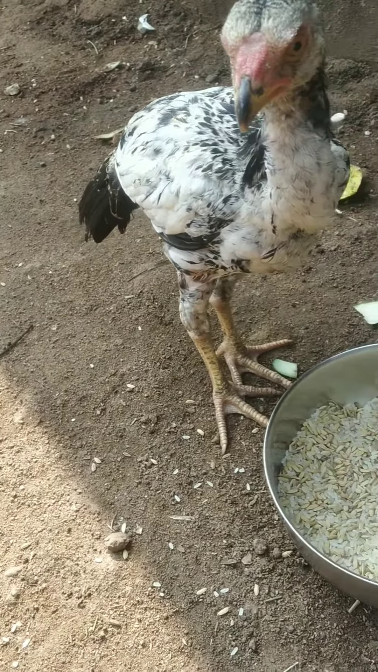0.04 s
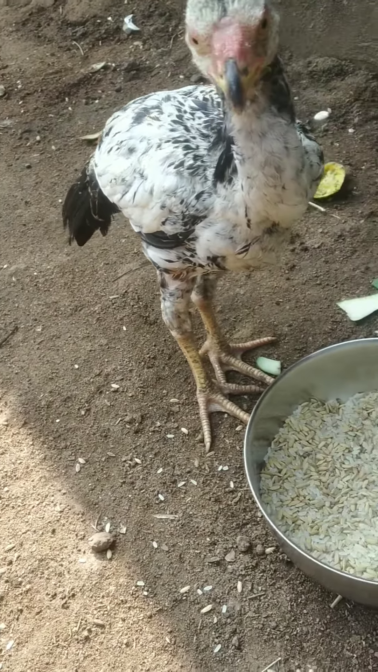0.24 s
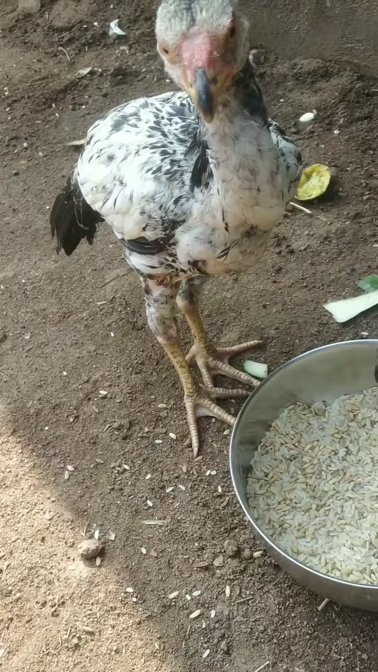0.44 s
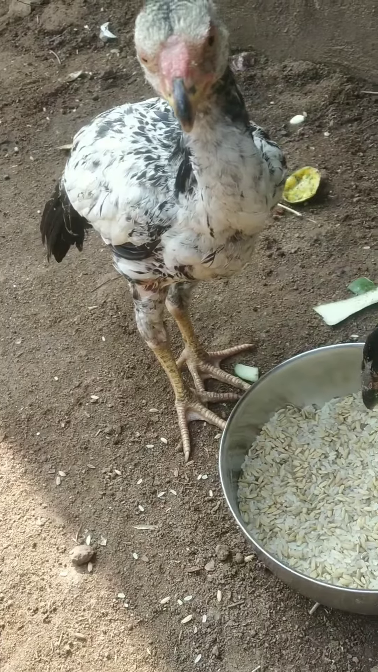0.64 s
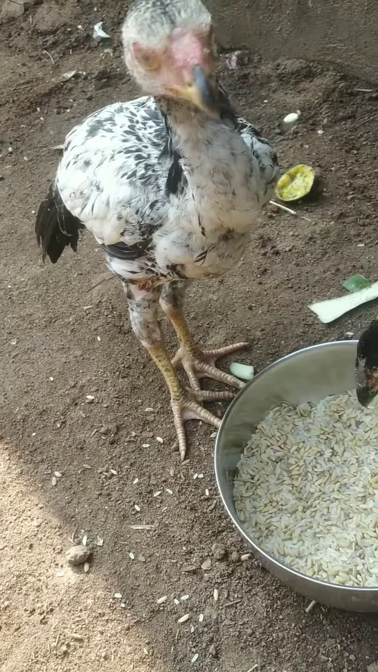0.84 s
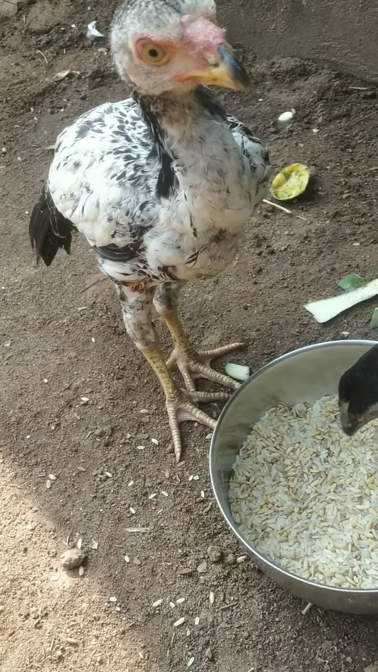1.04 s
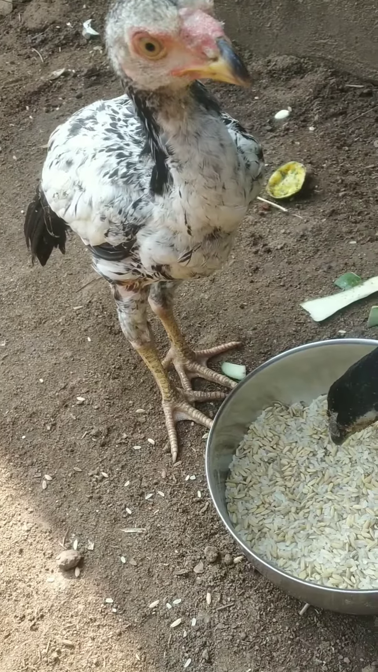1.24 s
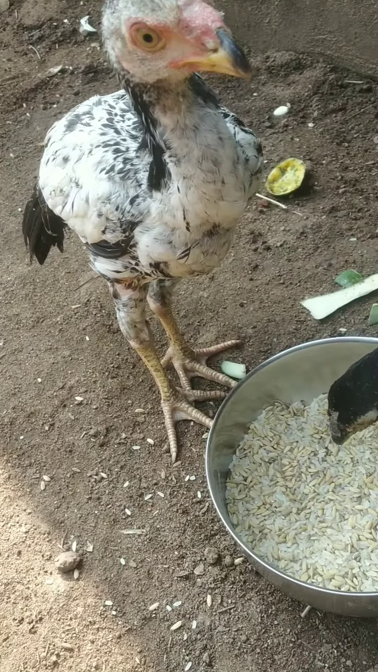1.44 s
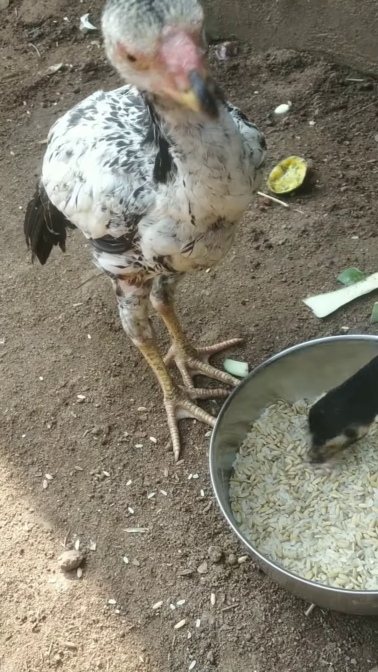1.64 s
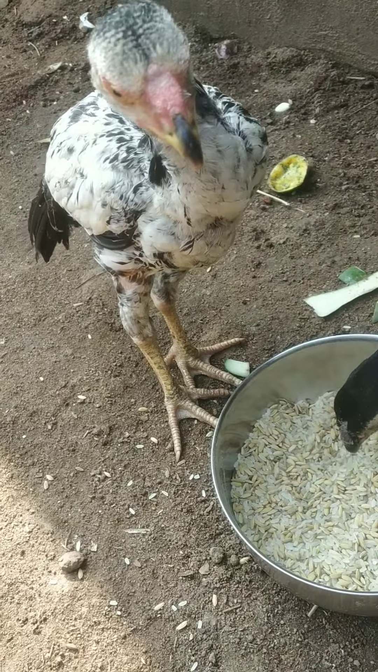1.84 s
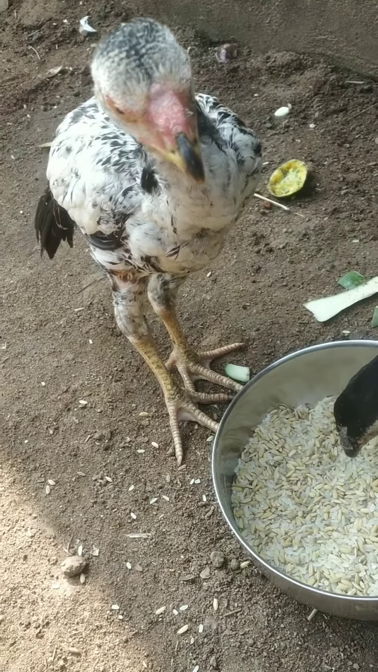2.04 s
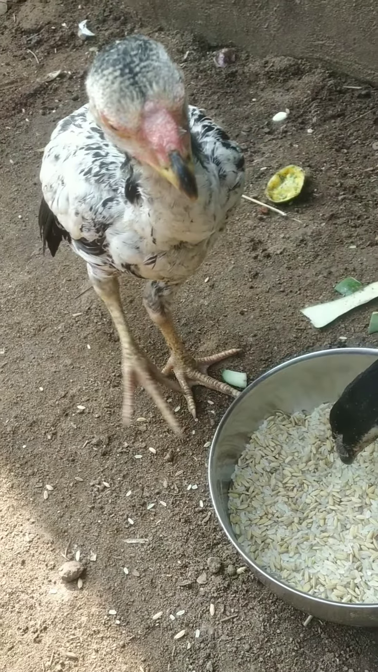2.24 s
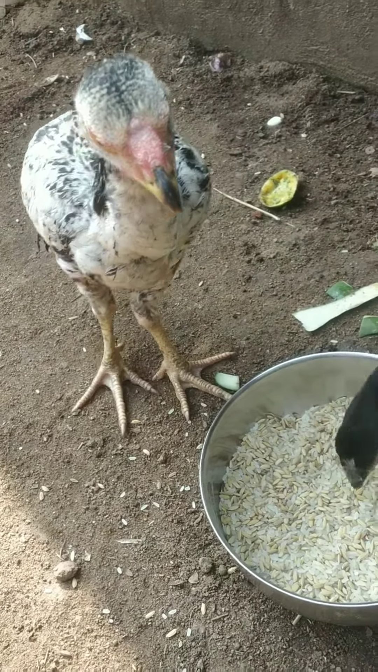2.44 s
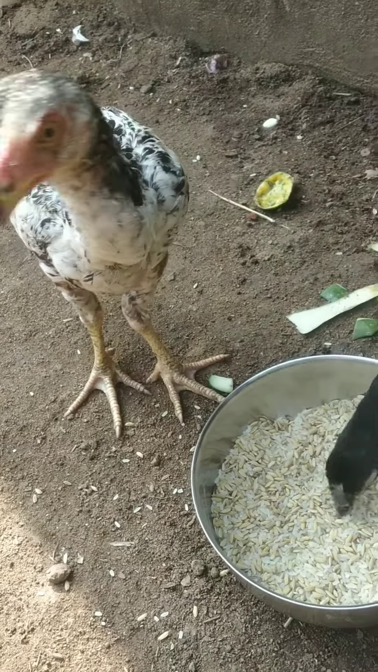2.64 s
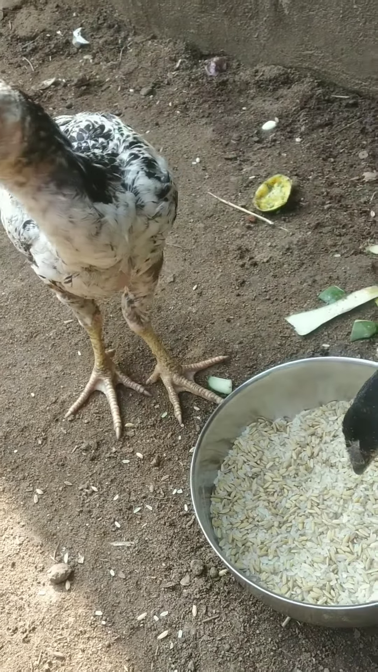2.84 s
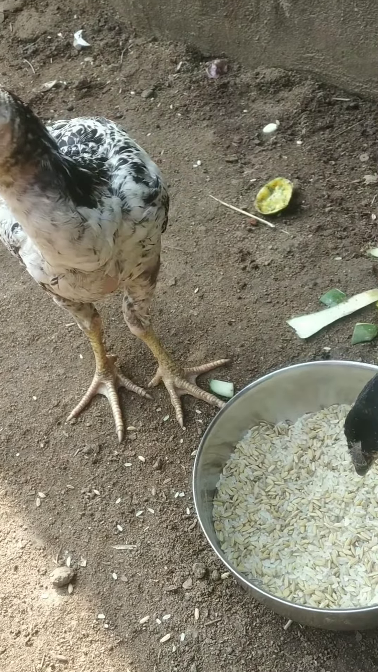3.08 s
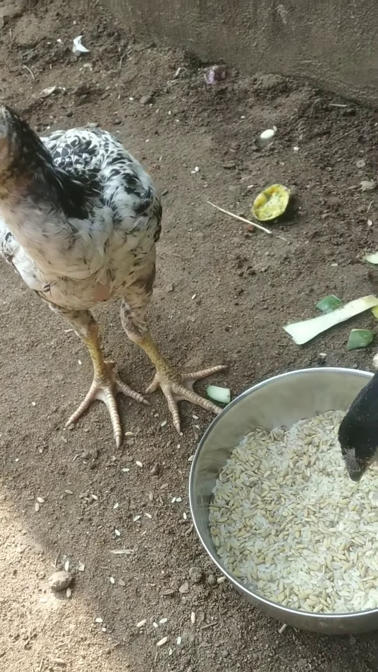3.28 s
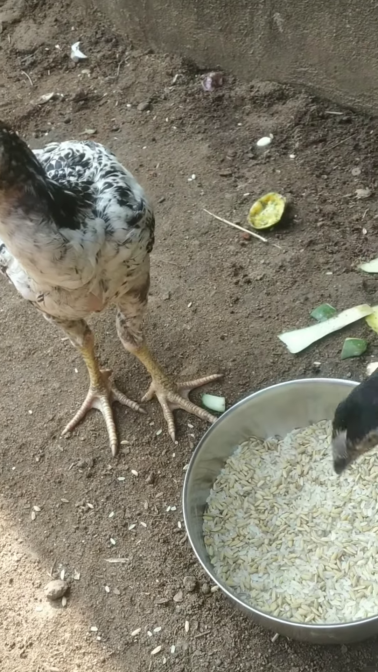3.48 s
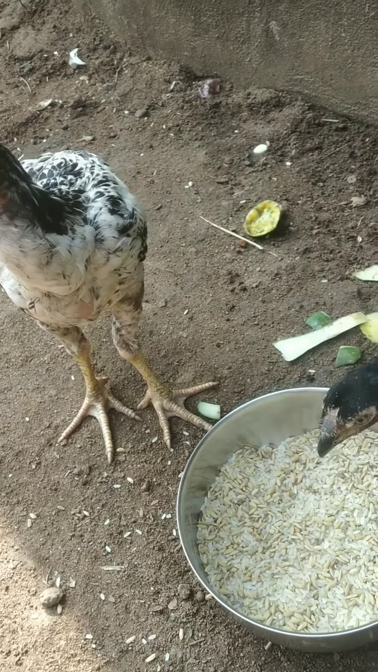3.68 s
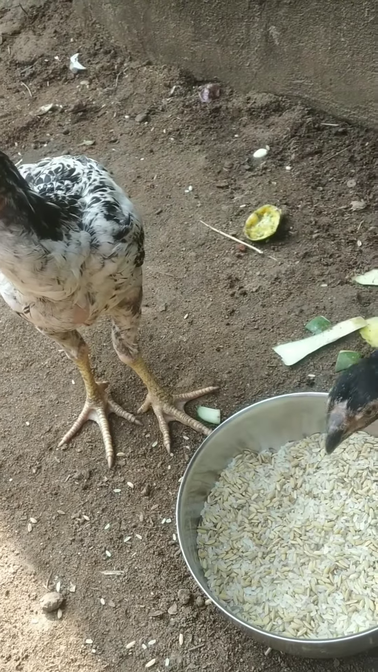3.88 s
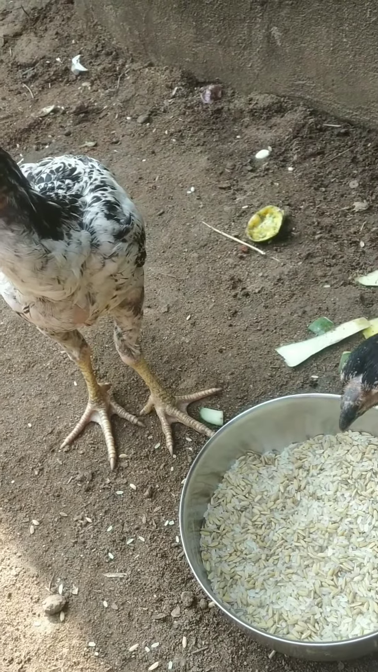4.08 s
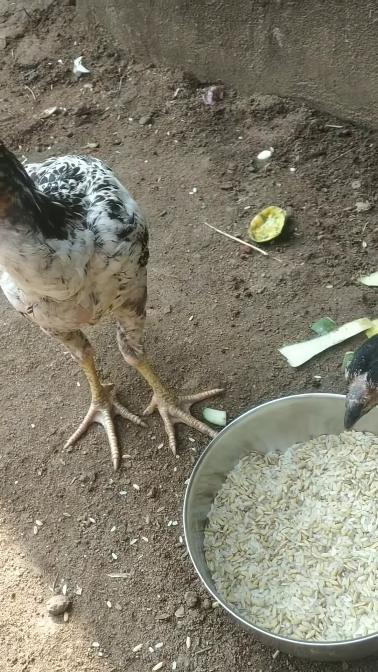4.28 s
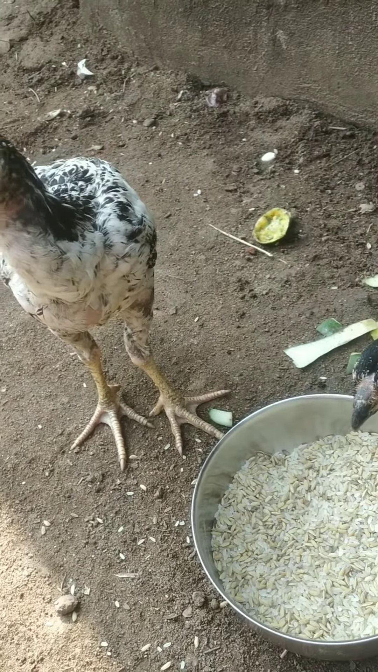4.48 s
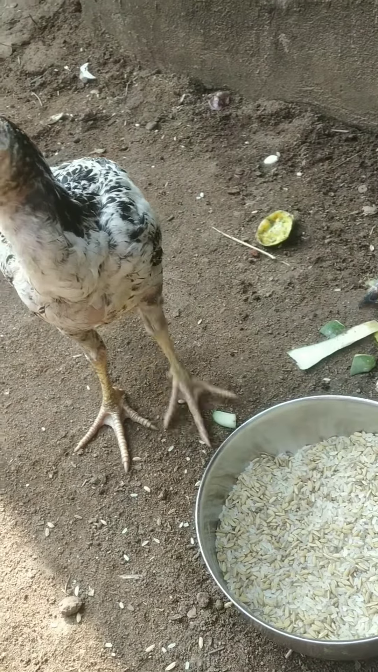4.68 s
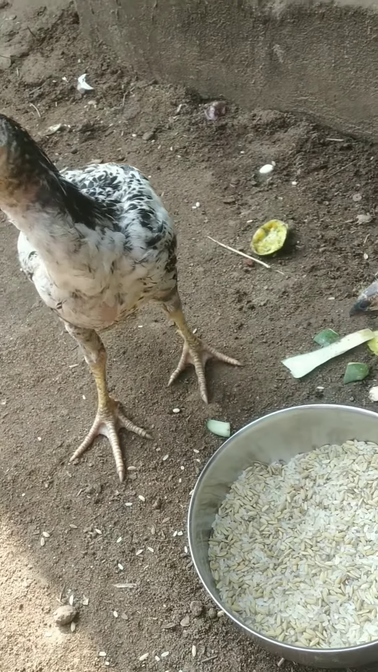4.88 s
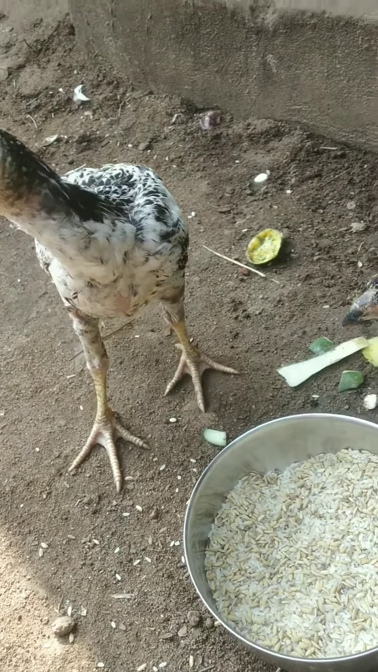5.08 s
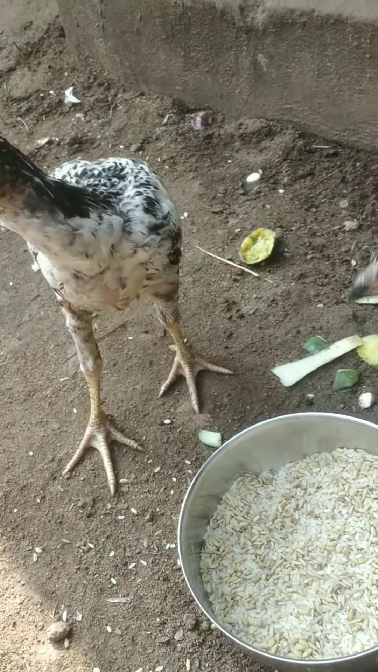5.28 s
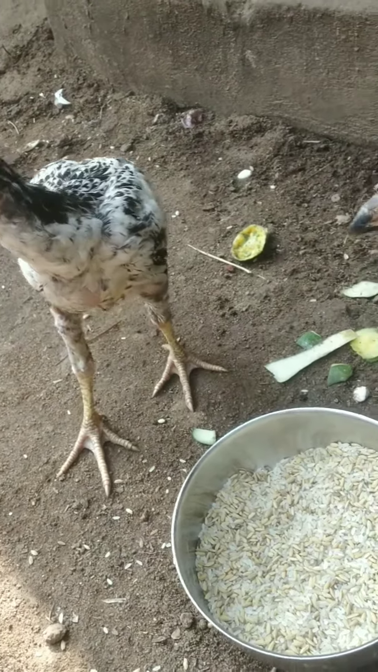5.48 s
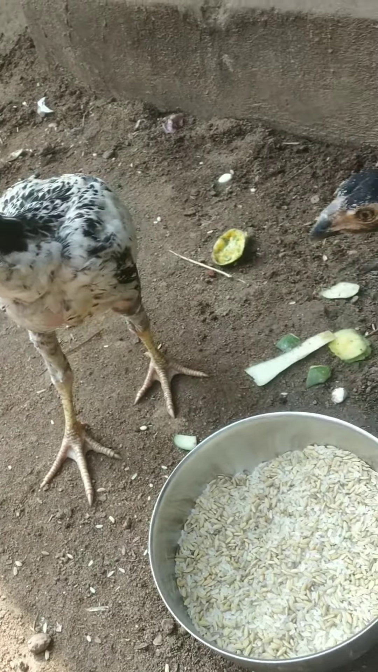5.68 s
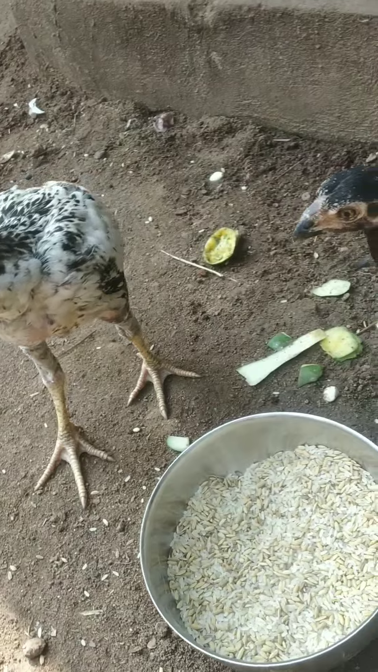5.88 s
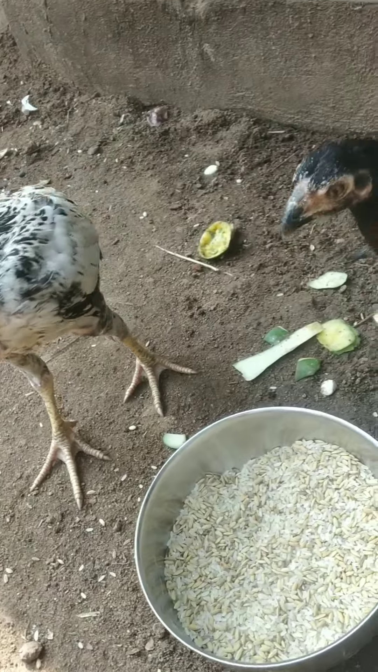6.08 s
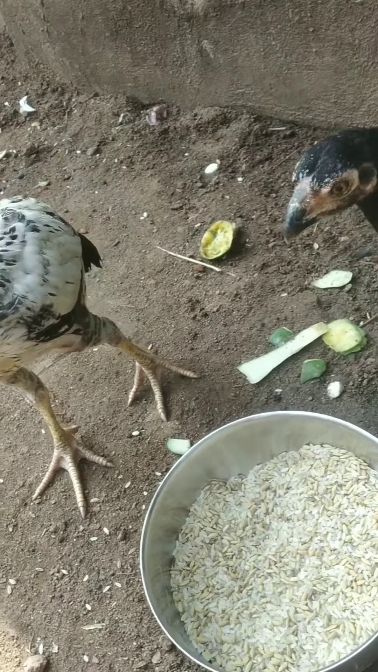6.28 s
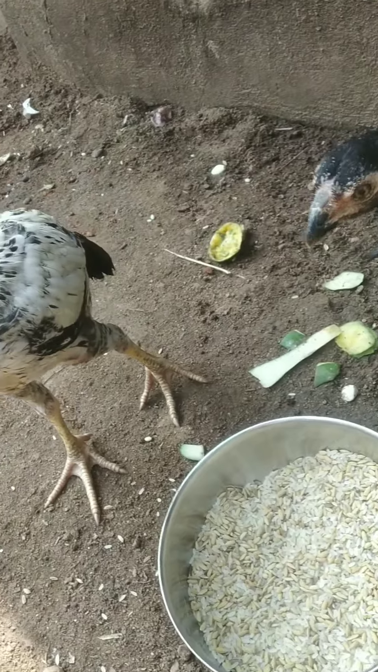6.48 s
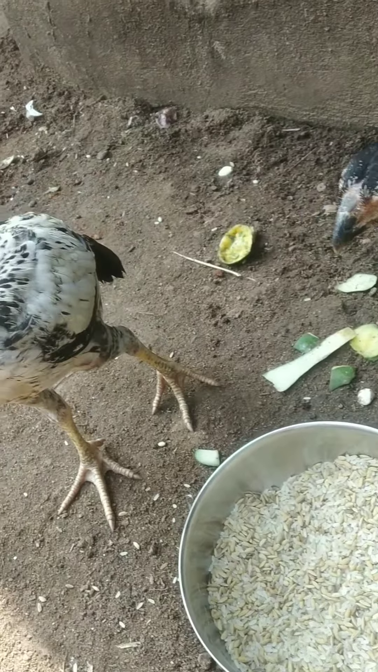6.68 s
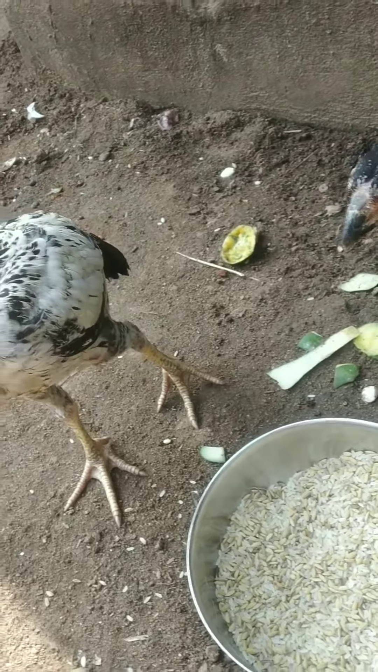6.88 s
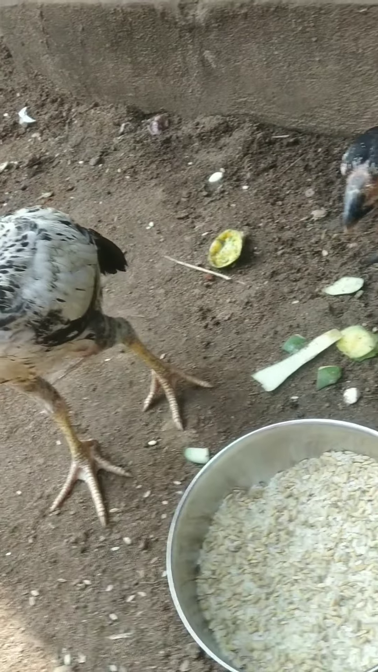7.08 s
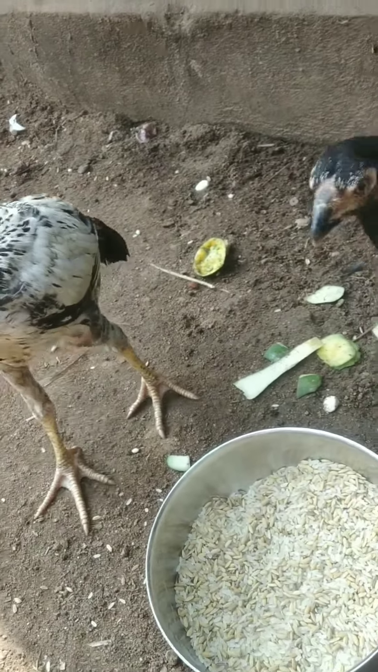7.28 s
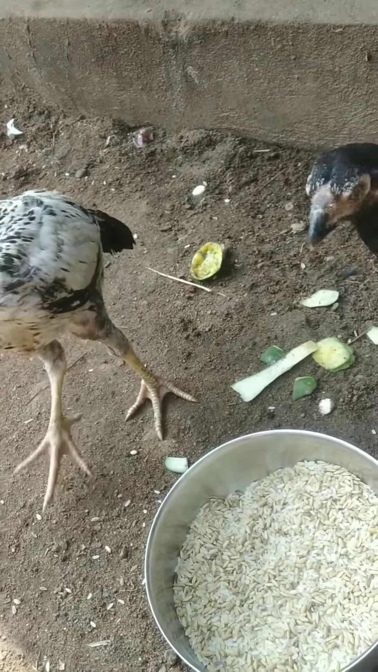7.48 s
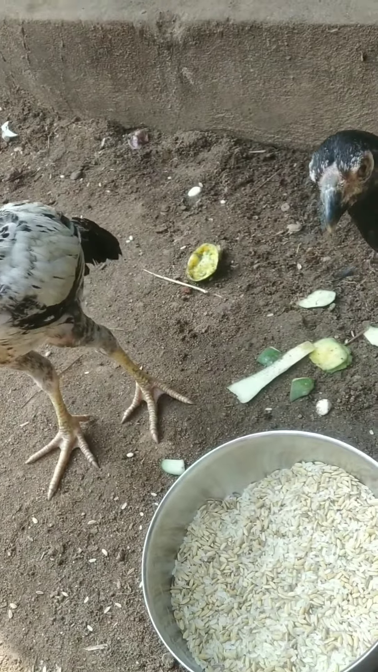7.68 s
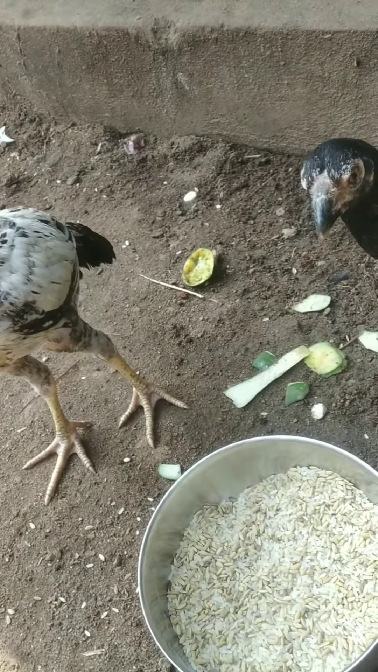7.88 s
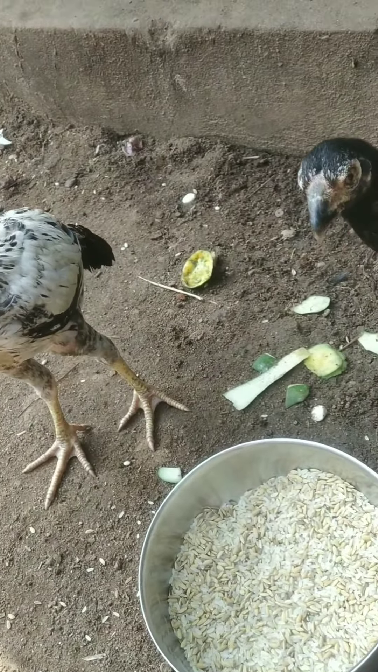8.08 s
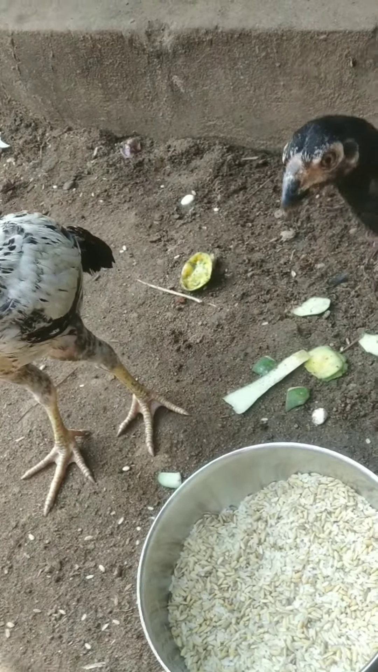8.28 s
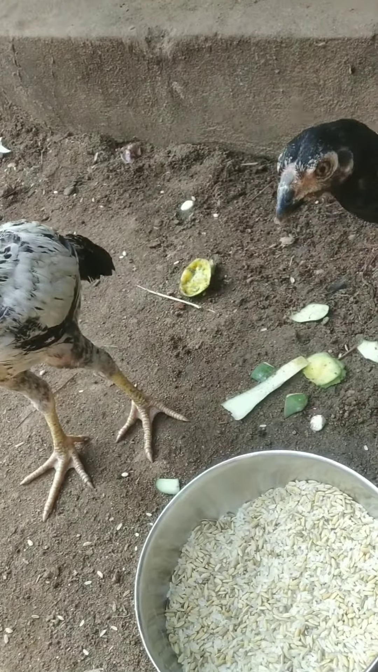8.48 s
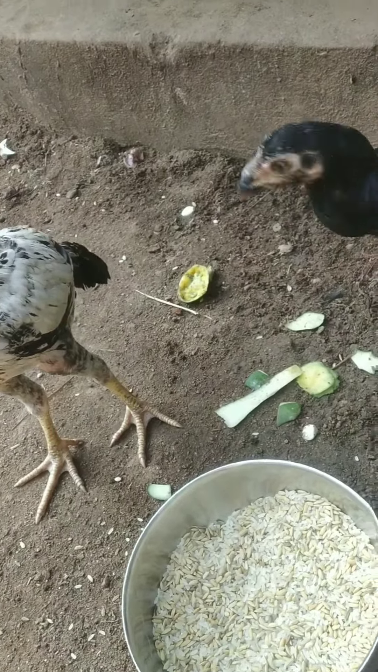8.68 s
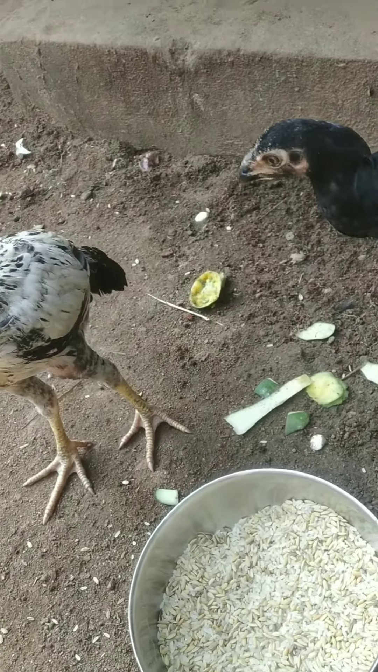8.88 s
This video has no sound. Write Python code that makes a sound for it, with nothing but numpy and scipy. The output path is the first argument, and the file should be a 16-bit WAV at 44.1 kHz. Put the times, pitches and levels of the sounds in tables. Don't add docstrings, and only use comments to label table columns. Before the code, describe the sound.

A handheld microphone sits near young chickens around a feed bowl. Fluttering, raspy whistles come first, then louder cracked squawks, a strong foot scrape with crisp double taps near five seconds, and a sparser spell of small peeps. Another squawk with a second hen leads into more scratchy calls and low clucks at the end. Faint distant birds and gentle low air noise fill the gaps outdoors.

```python
import sys
import numpy as np
from scipy import signal
from scipy.fft import rfft, irfft
from scipy.io import wavfile
from scipy.ndimage import uniform_filter1d, minimum_filter1d

SR = 44100
rng = np.random.default_rng(int(sys.argv[2]) if len(sys.argv) > 2 else 0)


def gain_from_decibels(decibels):
    exponent = np.asarray(decibels, float) / 20
    return 10 ** exponent


def put_to_file(sound):
    columns = np.atleast_2d(sound).T
    safe = np.clip(columns, -1, 1)
    whole_steps = np.round(safe * 32767)
    wavfile.write(sys.argv[1], SR, whole_steps.astype(np.int16))


N = 393813


def evened(x):
    return x / np.sqrt(np.mean(x ** 2) + 1e-20)


def read(points, hz):
    f, value = np.transpose(points)
    return np.interp(np.log(hz + 1), np.log(f + 1), value)


def add(mix, s, sound, lag):
    for port, start in zip(mix, (round(s * SR), round(s * SR) + lag)):
        part = port[start:][:len(sound)]
        part += sound[:len(part)]


def colour(x, points):
    gain = gain_from_decibels(read(points, np.fft.rfftfreq(x.shape[-1], 1 / SR)))
    return irfft(rfft(x) * gain, x.shape[-1])


def band(x, lo_hz, hi_hz, order=2):
    edges_hz = [lo_hz, min(hi_hz, SR / 2.2)]
    return signal.sosfilt(signal.butter(order, edges_hz, "band", fs=SR, output="sos"), x)


def wander(n, hz):
    settle = int(2 * SR / hz)
    return evened(band(rng.standard_normal(n + settle), hz / 4, hz)[settle:])


def peep(rows, flutter, hoarse):
    # frequency in Hz, gain in dB.
    beak_db = [(4300, -10), (4900, -2.5), (5400, -1), (6200, -9), (8000, 1), (10300, -5.5), (11800, -13.5),
               (15500, -0.5)]
    s, *columns = np.transpose(rows)
    t = np.arange(s[0], s[-1], 1 / SR)
    n = len(t)
    glide_hz, level_db, half_db, rasp_db, over_db = (np.interp(t, s, c) for c in columns)

    beat = (rng.random() + np.cumsum(58 * (1 + .15 * wander(n, 15))) / SR) % 1
    arch = np.sin(np.pi * beat)
    steep = np.clip(abs(np.gradient(glide_hz)) * SR / 32000, 0, 1) ** 2
    steep = uniform_filter1d(steep, 300)

    reread_s = min(.6 * flutter, .042) * steep * (beat - .5)
    hz = np.interp(t + reread_s, s, columns[0]) * (1 + flutter * (arch - 2 / np.pi))
    unrest = .045 * hoarse * np.clip(gain_from_decibels(rasp_db), 0, 1) * wander(n, 400)
    turn = 2 * np.pi * np.cumsum(hz * (1 + unrest)) / SR

    depth = min(12 * flutter, 1) * steep + 4 * flutter + .25 * wander(n, 30)
    depth = np.clip(depth, 0, 1)
    catch = evened(1 - depth * np.exp(-(arch / (.6 * depth + .01)) ** 2))

    windpipe = gain_from_decibels(2.14 * np.exp(-((hz - 2500) / 280) ** 2))
    half = np.cos(turn / 2) + 0.18 * np.cos(3 * turn / 2)
    voiced = np.sqrt(2) * (windpipe * np.cos(turn) + gain_from_decibels(half_db) * half)
    voiced = voiced * gain_from_decibels(1.72 * wander(n, 51.7))

    fuzzy = [np.cos(k * turn / 4) * wander(n, 200 * hoarse) for k in range(1, 18)]
    stack = sum(np.cos(k * turn) * gain_from_decibels(5 * wander(n, 25)) * 2 / k for k in range(2, 5))
    stack = stack + np.clip(gain_from_decibels(half_db), .15, 1) * sum(fuzzy[5::4])
    breath = rng.standard_normal(n)
    ragged = evened(sum(fuzzy[7::4]) + 1.3 * breath)
    over = evened(colour(evened(stack) + hoarse * ragged, beak_db))

    throat = band(breath, 1500, 1850) + band(breath, 2250, 2750) + .35 * band(breath, 1100, 3500, order=4)
    quarters = evened(sum(fuzzy[1:4]) + hoarse * fuzzy[3] + .3 * fuzzy[0])
    rasp = evened(quarters + .6 * evened(throat))

    patchy_db = 1
    rough = gain_from_decibels(rasp_db + patchy_db * wander(n, 21.1)) * rasp
    rough = rough + gain_from_decibels(over_db + patchy_db * wander(n, 20.33)) * over
    sound = catch * voiced + np.sqrt(catch) * rough
    return s[0], gain_from_decibels(level_db) * sound * signal.windows.tukey(n, .12)


def arched(start, rise, hold, fall, top_hz, drift_hz, whistle_db, opens, shuts, growth_db):
    s = start + np.cumsum([0, rise / 2, rise / 2, hold, fall / 2, fall / 2])
    up = top_hz * np.array([opens, opens + (1 - opens) * .62, 1])
    down = (top_hz + drift_hz) * np.array([1, shuts + (1 - shuts) * 0.54, shuts])
    level_db = np.array([-3, -6, 0, 0, 2.5, -15])
    level_db = level_db + growth_db / 2 * np.repeat([-1, 1], 3)
    return np.transpose([s, np.hstack([up, down]), whistle_db + level_db])


def broken(rows, *voice_db):
    rows = np.array(rows)
    edge_db = np.zeros(len(rows))
    edge_db[[0, -1]] = -14
    return np.hstack([rows, np.add.outer(edge_db - rows[:, 2], voice_db)])


def arched_peeps(near):
    # start in seconds, rise, hold and fall in seconds, top pitch in Hz.
    clear = [
        (0.101, .017, 0.017, .035, 2331),
        (1.961, 0.045, 0.05, 0.059, 3380),
        (2.306, .017, 0.15, 0.029, 2727),
        (2.568, 0.056, 0.031, 0.052, 3682),
        (3.399, .04, .045, 0.027, 3118),
        (7.241, .055, .045, 0.02, 2820),
        (8.103, 0.027, 0.12, 0.042, 3512),
        (8.796, 0.025, 0.061, 0.03, 2874),
    ]
    hoarse_calls = [
        (0.873, .075, .11, 0.073, 3570),
        (1.277, 0.057, 0.17, 0.031, 3063),
        (1.643, .05, 0.073, 0.029, 3713),
        (6.776, 0.015, 0.052, 0.058, 2437),
        (6.997, .012, .082, 0.032, 3392),
        (7.492, 0.033, 0.055, 0.062, 3484),
        (7.715, 0.044, 0.01, 0.048, 3775),
    ]
    # pitch drift over the hold in Hz, then whistle, half-pitch line, rasp and overtones in dB.
    clear_voice, hoarse_voice = [(106, -16, -23.5, -21, -28.5), (-230, -14.5, -57, -28.5, -22),
                                 (19, -12, -32.5, -21.5, -24.5), (-210, -13, -48, -21, -24),
                                 (95, -6, -29, -15, -20.5), (-35, -18, -40, -19, -28),
                                 (-190, -16, -59.5, -35, -36), (-170, -20, -49, -30.5, -43.5)], [(168.5, -23.5, -65, -31, -29),
                                                      (314, -22, -25, -21, -20), (-310, -14, -21, -20, -21),
                                                      (101, -15.5, -23, -15, -23),
                                                      (-69, -14, -28, -26, -19),
                                                      (-100, -23.5, -55, -25.5, -26),
                                                      (-100, -35, -52, -24, -31)]
    # share of the top pitch at the start, share at the end, growth over the hold in dB.
    clear_effort, hoarse_effort = [(0.63, 0.42, -4), (.6, .55, 2), (0.47, .75, -3), (.43, .55, 3.5),
                                   (.72, .72, -5.5), (.67, 0.42, -1), (0.72, .63, 1.5), (0.98, .85, -4.5)], [(0.86, .42, 1.5), (0.47, 0.25, -2),
                                                         (.42, 0.85, -10.5), (0.73, 0.43, -7.5),
                                                         (.94, 0.31, -6), (0.89, 0.41, 13), (.4, 0.31, -20)]
    clear_flutter, hoarse_flutter = [.1, .13, .1, .1, .03, .12, .05, .09], [.14, .07, .07, .08, .07, .07, .08]
    clear_lag, hoarse_lag = [23, 21, 13, 19, 12, 9, 13, 9], [21, 23, 23, 16, 19, 16, 14]
    for hoarse, *kind in ((.5, clear, clear_voice, clear_effort, clear_flutter, clear_lag),
                          (1, hoarse_calls, hoarse_voice, hoarse_effort, hoarse_flutter, hoarse_lag)):
        for row, voice, effort, flutter, lag in zip(*kind):
            call = arched(*row, *voice[:2], *effort)
            add(near, *peep(broken(call, *voice[2:]), flutter, hoarse), lag)


def squawks(near):
    # time in seconds, pitch in Hz, whistle level in dB.
    squawk_lines = [
        [(2.922, 1757, -16.5), (2.945, 2907, -6.5), (3.022, 3092, -5.5), (3.035, 3439, -20), (3.07, 3420, -19),
         (3.09, 2666, -12.5), (3.14, 3014, -24), (3.16, 1990, -6)],
        [(4.512, 1818, 10), (4.53, 3046, -17), (4.59, 3396, -11.5), (4.645, 4083, -10), (4.67, 3620, -9),
         (4.7, 2347, -15.5), (4.72, 1480, -5.5), (4.755, 1370, -36)],
        [(3.97, 2820, -19), (3.995, 3290, -12.5), (4.085, 3860, -16), (4.12, 4393, -13.5), (4.15, 4663, -18),
         (4.2, 4900, -24), (4.225, 3675, -16), (4.26, 3657, -26), (4.29, 1750, -27)],
        [(6.352, 2630, -4), (6.37, 3010, -17.5), (6.405, 3265, -22), (6.46, 2990, -26), (6.575, 2695, -22),
         (6.63, 2920, -21.5), (6.66, 1882, -19), (6.685, 1261, -16)],
    ]
    # half-pitch line, rasp and overtones in dB.
    squawk_voice = [(-25.5, -24, -21), (-30, -26.5, -22), (-36, -20.5, -22.5), (-21.5, -19, -25.5)]
    squawk_manner = [(.05, .5, 12), (.04, .5, 12), (.05, 1, 21), (.08, 1, 15)]
    for rows, voice, (flutter, hoarse, lag) in zip(squawk_lines, squawk_voice, squawk_manner):
        add(near, *peep(broken(rows, *voice), flutter, hoarse), lag)


def slur(start, length, from_hz, to_hz, level_db, shape):
    when, glide, db = np.transpose(shape)
    return np.transpose([start + length * when, from_hz + (to_hz - from_hz) * glide, level_db + db])


def pure_peeps(near):
    # start and length in seconds, first and last pitch in Hz, whistle level in dB.
    pure = [
        (0.592, 0.14, 2966, 1776, -28.5),
        (3.654, 0.092, 2365, 3423, -28),
        (5.288, 0.039, 2816, 2540, -15),
        (5.6, .06, 2615, 3080, -34),
        (6.064, 0.076, 2347, 1796, -19),
    ]
    # share of length, share of glide, level in dB.
    pure_shape = [(0, 0, -16), (0.421, 0, -6.5), (.63, .65, -2.5), (1, 1, -12)]
    # time in seconds, pitch in Hz, whistle level in dB.
    second_hen = [
        (6.385, 2120, -22),
        (6.4, 2142, -11),
        (6.54, 1823, -14),
        (6.56, 1810, -34),
    ]
    for rows in [slur(*row, pure_shape) for row in pure] + [second_hen]:
        voiced_rows = [(*row, -24, -18, -22) for row in rows]
        add(near, *peep(voiced_rows, flutter=.06, hoarse=.5), 18)


def slide(rows, rough, fall_db, order=1):
    s, hz, level_db = np.transpose(rows)
    t = np.arange(s[0], s[-1], 1 / SR)
    shaken_hz = np.interp(t, s, hz) * (1 + rough * wander(len(t), 171))
    turn = 2 * np.pi * np.cumsum(shaken_hz) / SR
    tone = sum(gain_from_decibels(-fall_db * abs(np.log2(k / order)) / order) * np.cos(k * turn / order)
               for k in range(1, 5))
    level = gain_from_decibels(np.interp(t, s, level_db) + 60 * rough * wander(len(t), 119.7))
    return s[0], np.sqrt(2) * level * tone * signal.windows.tukey(len(t), .1)


def clucks(near):
    # start and length in seconds, first and last pitch in Hz, level in dB.
    cluck_calls = [
        (0.943, 0.12, 634, 712, -30.5),
        (3.153, 0.016, 1530, 1170, -13.5),
        (3.397, 0.11, 697, 793, -19),
        (4.501, 0.075, 1180, 1040, -21),
        (6.488, .13, 648, 701, -23.5),
        (6.727, 0.13, 730, 734, -24),
        (7.092, 0.031, 1380, 1138, -19.5),
        (7.625, 0.046, 1110, 1038, -18.5),
        (8.82, 0.13, 725, 759, -22.5),
        (8.825, .1, 1000, 1040, -27),
    ]
    cluck_order = [3, 1, 1, 1, 1, 1, 1, 1, 1, 1]
    # share of length, share of glide, level in dB.
    cluck_shape = [(0, 0, -4.5), (.25, 1, 4.5), (.7, 0.74, 2.5), (1, 1, -15.5)]
    for row, order in zip(cluck_calls, cluck_order):
        add(near, *slide(slur(*row, cluck_shape), rough=.05, fall_db=22, order=order), 12)


def grit(start_s, end_s, hiss_db, low_db):
    n = round((end_s - start_s) * SR)
    clumps = gain_from_decibels(1.25 * wander(n, 20.6))
    grains = rng.standard_normal(n) * gain_from_decibels(0.93 * wander(n, 464)) * clumps
    low = band(rng.standard_normal(n), 210, 710) * clumps
    sound = gain_from_decibels(hiss_db) * evened(band(grains, 750, 24700)) + gain_from_decibels(low_db) * evened(low)
    return start_s, sound * signal.windows.tukey(n, .5)


def feet(near):
    # start and end in seconds, hiss in dB, rumble in dB.
    scrapes = [(0.552, 0.765, -41, -60), (0.876, 1.128, -37, -35.5), (2.722, 2.81, -29.5, -38),
               (3.164, 3.45, -32, -43), (4.297, 4.458, -35.5, -35.5), (4.962, 5.37, -26, -34.5),
               (5.299, 5.592, -42.5, -45.5), (6.2, 7.95, -45, -47.5), (0.999, 3.615, -42.5, -53),
               (3.848, 5.022, -42.5, -47.5), (7.375, 7.645, -31.5, -28), (7.865, 8.013, -41, -45),
               (8, 8.908, -44.5, -51.5)]
    for row in scrapes:
        add(near, *grit(*row), 20)


def tap(peak_db, thump_db):
    t = np.arange(SR // 20) / SR
    swell_s = np.where(t < .008, .003, .006)
    clump = rng.standard_normal(len(t)) * np.exp(-abs(t - .008) / swell_s)
    tick = band(clump, 1500, 9900)
    thump = 4 * band(clump, 182, 735)
    return gain_from_decibels(peak_db) * (tick + gain_from_decibels(thump_db) * thump)


def beak_taps(near):
    # time in seconds, peak level in dB, thump against tick in dB.
    pecks = [(2.269, -33, -18), (3.922, -33, 0), (3.946, -37, 4), (4.197, -20, 8.5), (4.3861, -11, 4),
             (5.043, -29, 7), (5.061, -34.5, 15), (5.102, -9.5, -7.5), (5.123, -10.5, -7.5),
             (5.599, -30, -4), (7.8966, -32.5, 7.5)]
    for s, peak_db, thump_db in pecks:
        add(near, s - .006, tap(peak_db, thump_db), 20)


def walls(x, t60, start_s):
    t = np.arange(SR // 2) / SR
    sign = rng.choice([-1., 1.], (2, len(t)))
    hits = rng.random((2, len(t))) < .05
    taps = sign * hits * (t > start_s) * gain_from_decibels(-60 * t / t60)
    return signal.fftconvolve(x[None], taps / np.linalg.norm(taps[0]), axes=1)[:, :N]


def far_birds():
    # start and length in seconds, first and last pitch in Hz, level in dB.
    bird_calls = [
        (0.26, 0.22, 6400, 3730, -55),
        (0.21, 0.094, 4600, 3660, -52.5),
        (4.826, 0.08, 5400, 3850, -48.5),
        (5.617, 0.16, 5600, 4040, -52),
        (6.128, .11, 5820, 3950, -51),
        (8.452, 0.077, 4620, 3700, -56),
        (8.598, 0.092, 5200, 4000, -51.5),
        (5.85, .13, 6100, 5200, -63),
        (5.93, .1, 4700, 4000, -59),
    ]
    # share of length, share of glide, level in dB.
    bird_shape = [(0, 0, -7), (.52, .75, 6.5), (1, 0.92, 2.5)]
    far = np.zeros((2, N))
    for row in bird_calls:
        add(far, *slide(slur(*row, bird_shape), rough=0.018, fall_db=40), 2)
    return 2.64 * far + 2.0 * walls(far[0], 0.53, .002)


def yard():
    # frequency in Hz, density in dB per Hz.
    air_db = [(70, -7.5), (220, 18.5), (500, 1), (1600, -8.5), (5000, -9), (15000, -19.5)]
    a = rng.standard_normal((3, N))
    shared = colour(a[2], [(300, -2.0), (1400, 0.5)])
    unrelated = colour(a[:2], [(150, -19), (1000, 11.5)])
    return gain_from_decibels(-41.5) * evened(colour(shared + unrelated, air_db)) * gain_from_decibels(2.18 * wander(N, 3.61))


def shade(x):
    # frequency in Hz, how much louder the left port is in dB.
    left_db = [(500, 2), (2500, 7), (10000, 11.5)]
    tilt = gain_from_decibels(read(left_db, np.fft.rfftfreq(N, 1 / SR)) / 2)
    return irfft(rfft(x) * np.array([tilt, 1 / tilt]), N)


def scene():
    near = np.zeros((2, N))
    for source in (arched_peeps, squawks, pure_peeps, clucks, feet, beak_taps):
        source(near)
    ground = gain_from_decibels(-4) * walls(near[0], .03, .0005)
    yard_walls = gain_from_decibels(-17.5) * walls(near[0], 0.26, .01)
    return shade(near) + ground + yard_walls + far_birds() + yard()


def top_cut(x):
    return signal.sosfilt(signal.butter(12, 15900, fs=SR, output="sos"), x)


def record(dry):
    room_left = minimum_filter1d(1 / np.maximum(abs(dry), 1), 64, axis=1)
    held = dry * uniform_filter1d(room_left, 90, axis=1)
    return top_cut(np.clip(held, -1, 1))


dry = scene()
out = record(dry)
put_to_file(out)
```